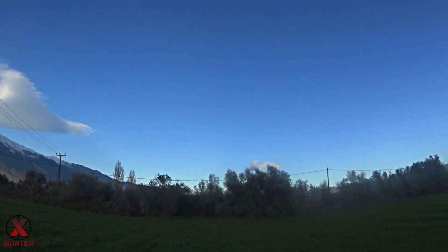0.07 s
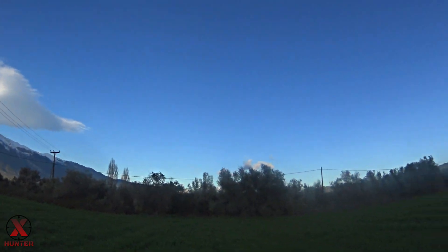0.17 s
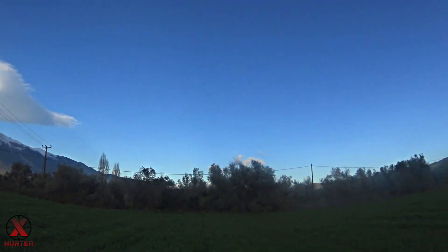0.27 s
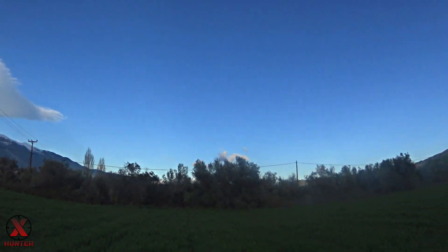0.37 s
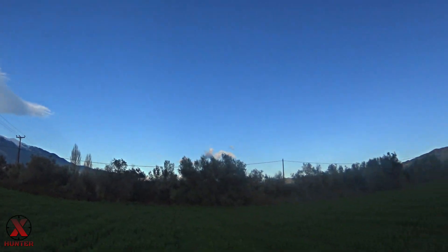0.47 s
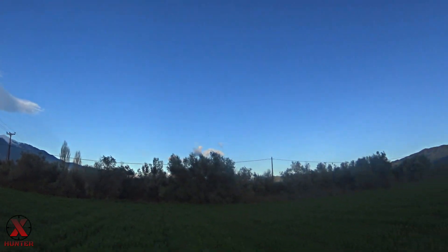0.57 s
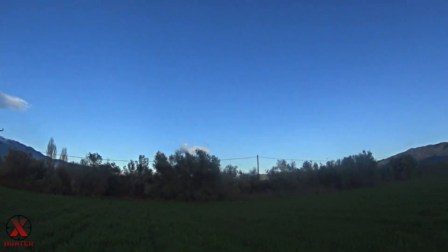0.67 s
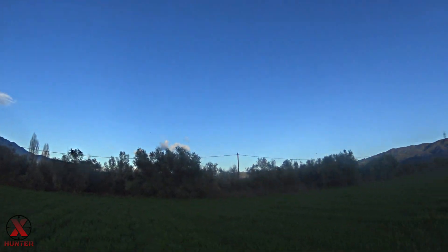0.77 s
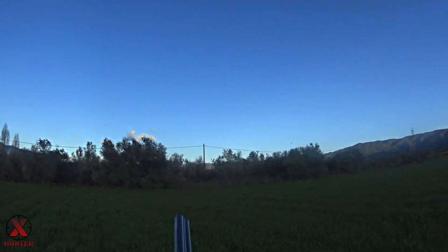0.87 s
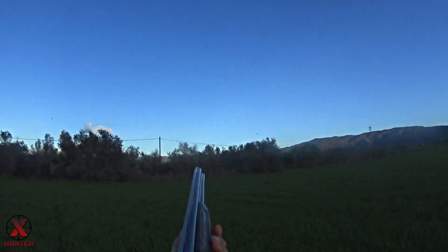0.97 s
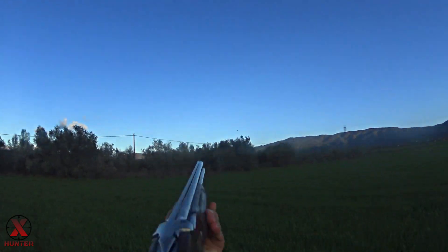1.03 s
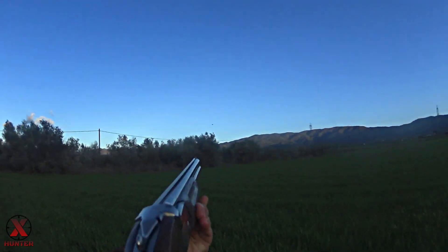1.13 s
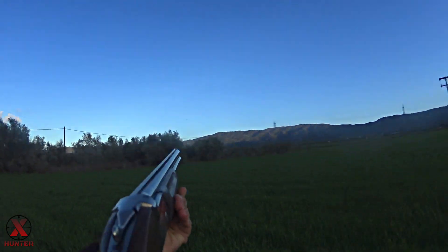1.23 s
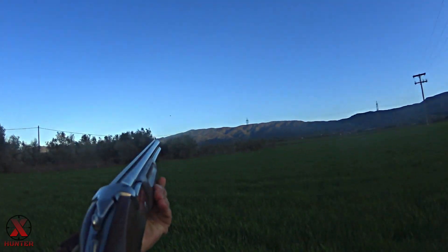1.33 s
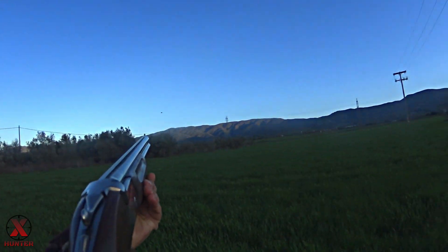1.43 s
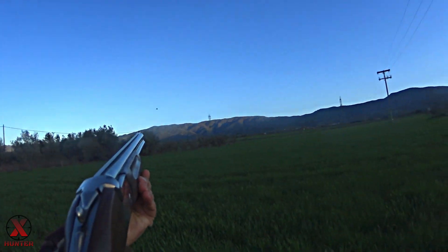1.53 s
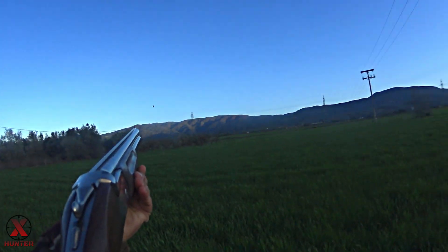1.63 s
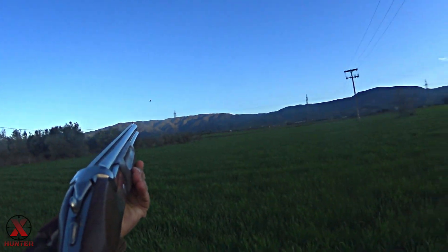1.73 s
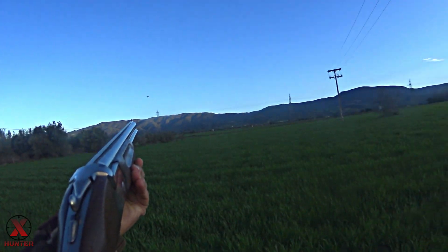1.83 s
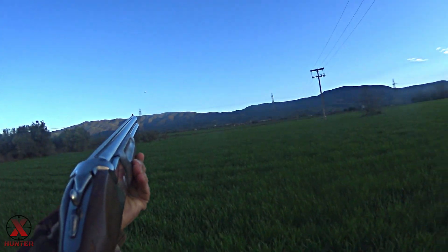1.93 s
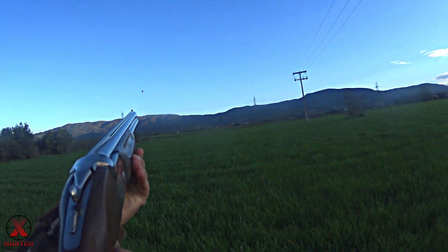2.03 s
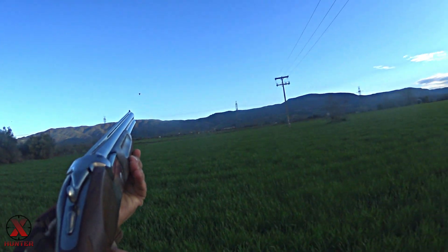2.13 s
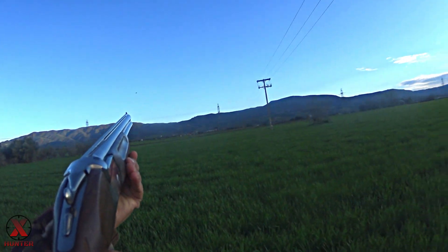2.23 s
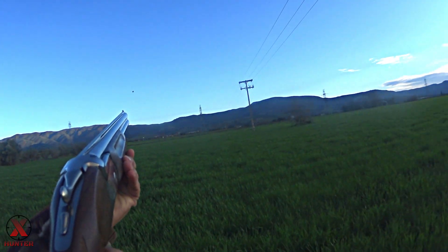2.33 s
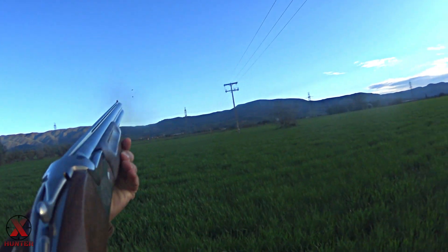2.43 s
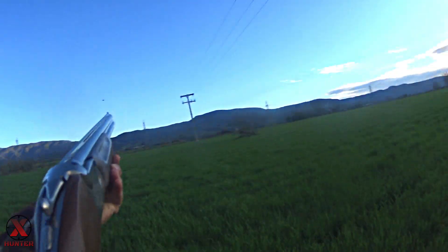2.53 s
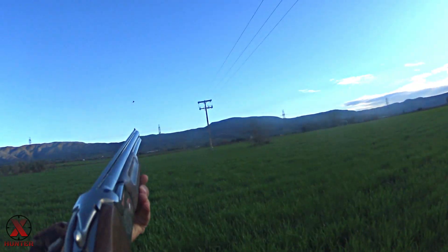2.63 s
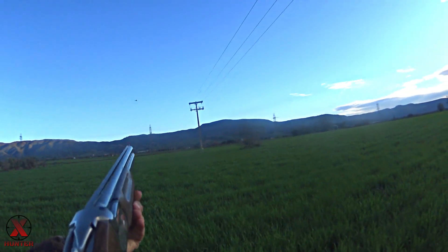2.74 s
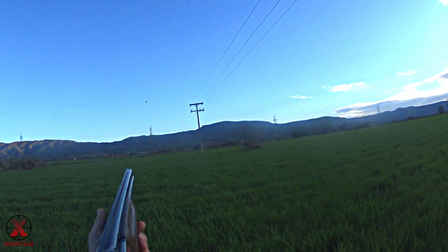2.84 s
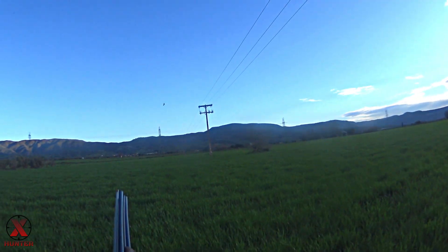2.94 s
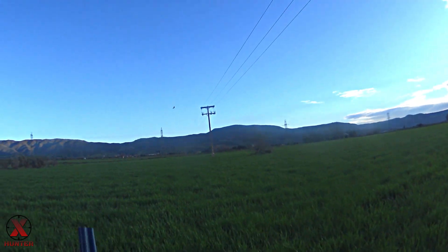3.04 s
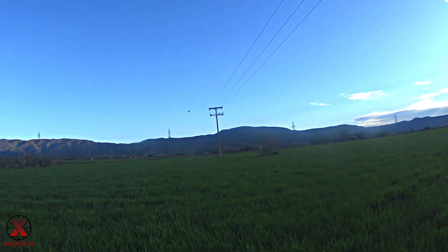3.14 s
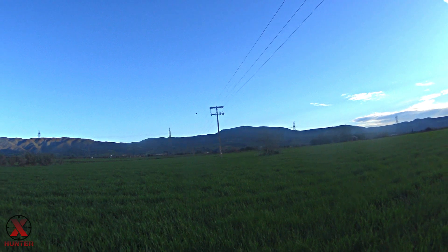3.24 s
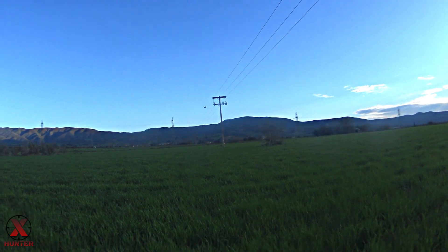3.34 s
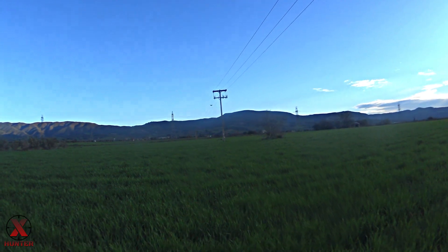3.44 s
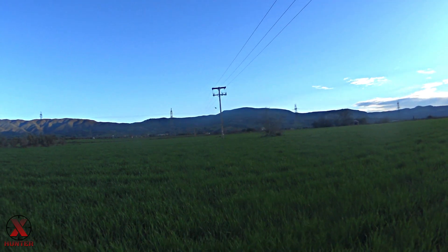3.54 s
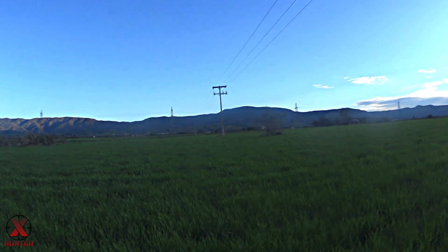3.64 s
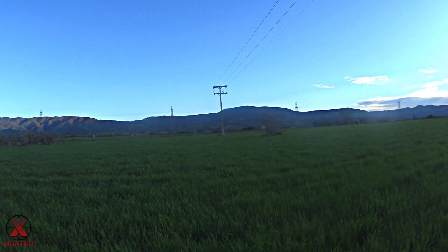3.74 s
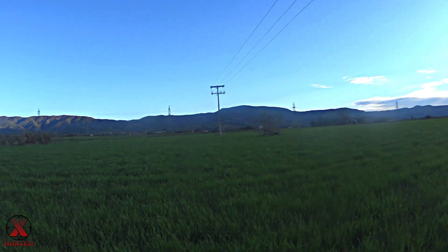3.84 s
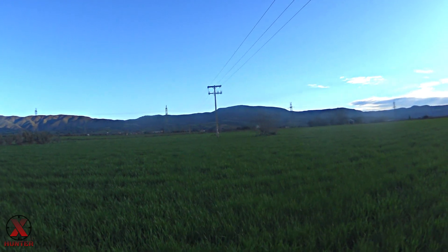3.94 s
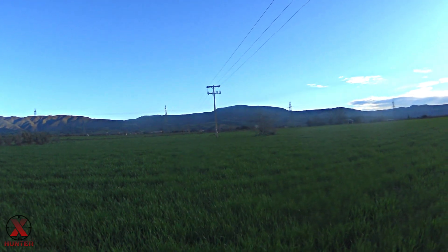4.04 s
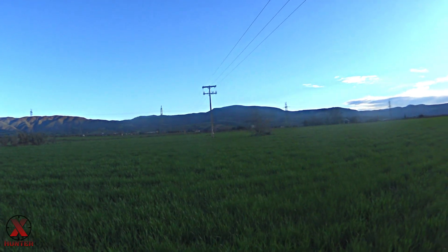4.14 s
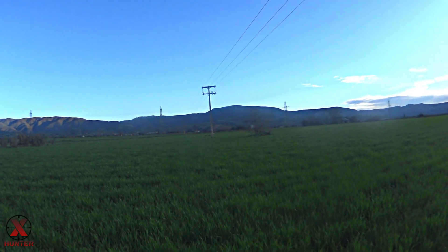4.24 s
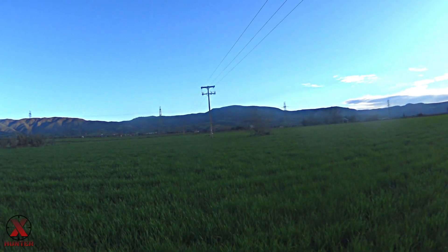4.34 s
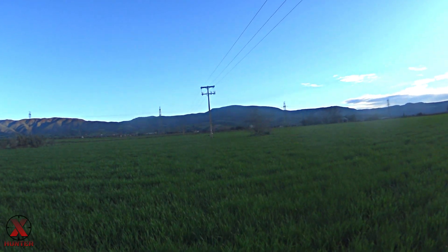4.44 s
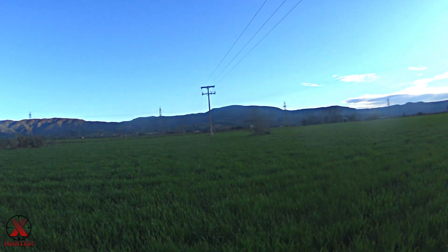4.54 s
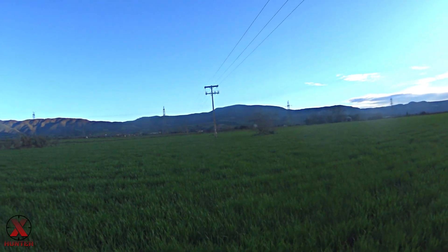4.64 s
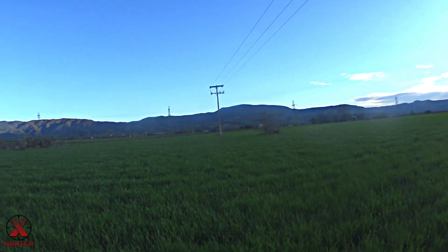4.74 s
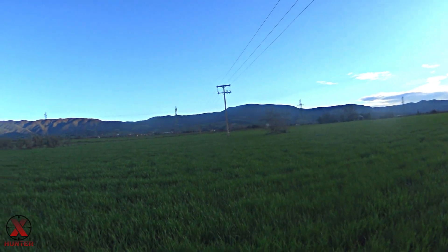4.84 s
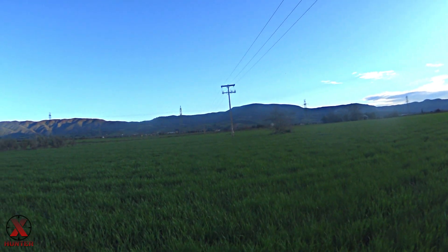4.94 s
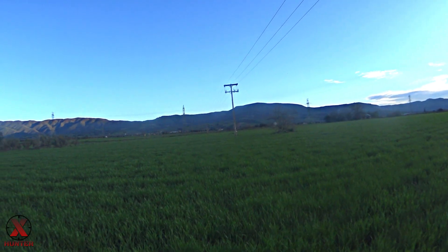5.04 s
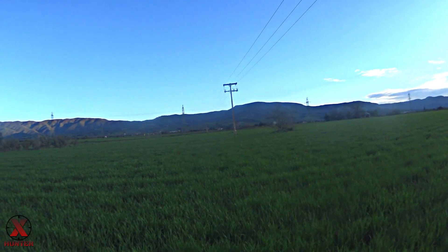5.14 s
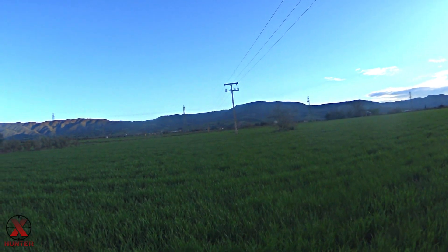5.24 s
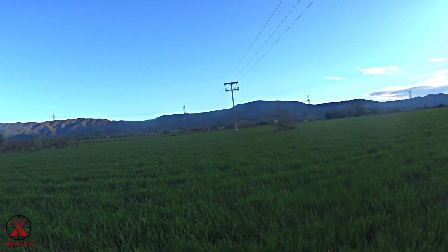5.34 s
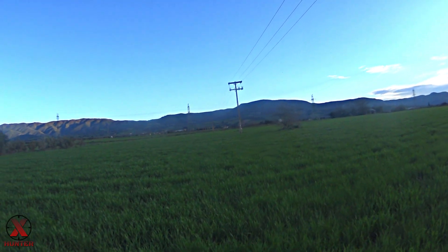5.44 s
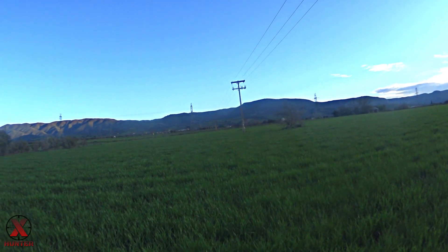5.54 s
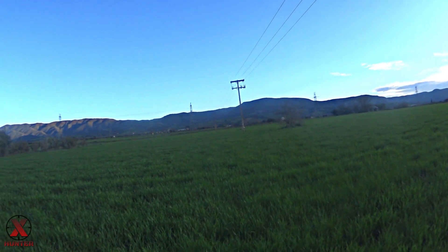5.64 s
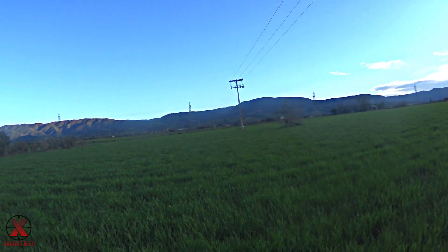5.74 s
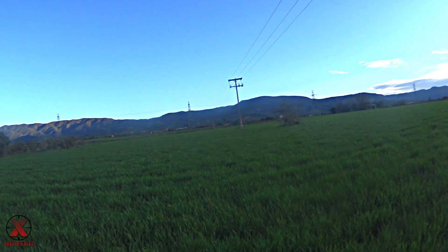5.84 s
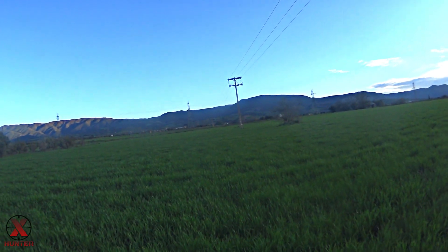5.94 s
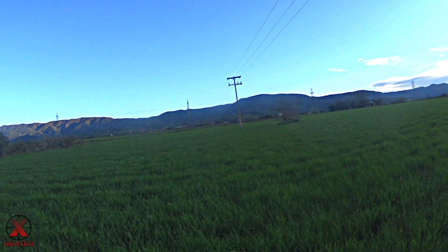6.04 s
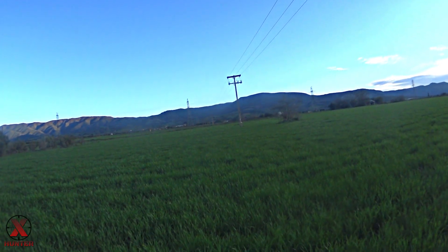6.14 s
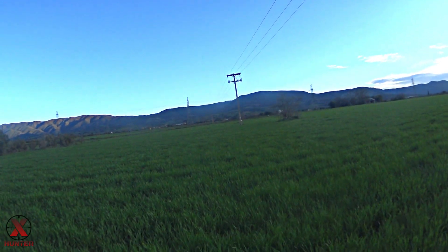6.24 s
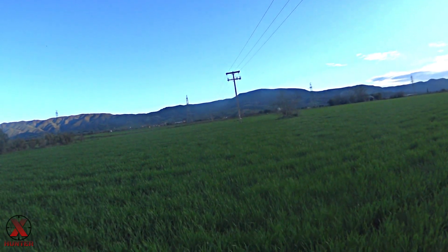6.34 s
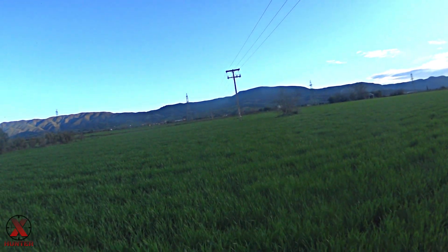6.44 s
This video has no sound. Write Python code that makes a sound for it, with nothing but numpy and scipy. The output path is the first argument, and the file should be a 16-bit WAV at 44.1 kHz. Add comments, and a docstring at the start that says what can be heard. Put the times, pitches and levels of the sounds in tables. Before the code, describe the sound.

Clothes rustle, a shotgun fires once and echoes away outdoors, then gear knocks and the gun clicks sharply over light wind.

```python
"""A shotgun in a breezy field

One shot, heard from inside a plastic case worn by the shooter. Clothes rustle as the gun comes up.
The hammer falls, the blast rolls away over the field and the recoil jolts the case. Gear knocks on
the case as the gun is lowered, a far bird whistles, and handling the gun makes a run of sharp clicks.
Gusts buffet the microphone openings, over a steady airy hiss with faint, slow, breath-like swells."""
import sys
import numpy as np
from scipy import signal
from scipy.fft import rfft, irfft
from scipy.io import wavfile

SR = 44100
rng = np.random.default_rng(int(sys.argv[2]) if len(sys.argv) > 2 else 0)


def wav_record(signal):
    """Record a signal, one row per channel, as 16-bit PCM in the file named by sys.argv[1]."""
    frames = np.transpose(np.atleast_2d(signal))
    bounded = np.clip(frames, -1, 1)
    # unit amplitude maps onto the largest positive 16-bit level
    quanta = np.round(bounded * 32767).astype(np.int16)
    wavfile.write(sys.argv[1], SR, quanta)


N = 286650
T = np.arange(N) / SR
ROLL_START_S, CUTOFF_HZ = 2.431, 11100

# Levels in a table are relative. A "colour" says how strong a noise is at each frequency.
# bursts at the front of the shot: t/s, level/dB, hold/s, decay/s, low cut/Hz
BURSTS = [(2.4086, -26, 0.0012, .002, 2190), (2.41, -36.5, 0.011, .002, 2000),
          (2.423, -14, 0.0014, 0.0038, 890), (2.428, -6.5, 0.0015, 0.0025, 260),
          (2.435, -14, .003, .003, 600), (2.479, -23.5, 0.0015, 0.002, 250),
          (2.508, -34, .0015, .0025, 500), (2.53, -27, 0.0015, 0.003, 350)]
# colour of those bursts: f/Hz, level/dB
BURST_COLOUR = [(200, -13.5), (400, 8.5), (720, 5), (950, -10), (1300, 8.5), (2000, -4.5), (3800, 0.5),
                (6000, -1.5), (8500, -4.5), (11000, -2.5)]
# colour of the shot as it rolls away: f/Hz, level/dB
ROLL_COLOUR = [(150, -25), (370, -13.5), (520, -13), (720, -10.5), (1000, -6.5), (1320, -5.5), (1650, -5.5),
               (2150, -7), (2650, -3.5), (3400, -3.5), (5900, 5), (7000, -2), (10000, -8), (11000, -7)]
# colour of the rumble under it: f/Hz, level/dB
RUMBLE_COLOUR = [(15, 6.5), (30, 1), (80, -5), (180, -1.5), (350, -3.5), (1000, -41)]
# how each part of the roll fades: level/dB, hold/s, fall/(dB/s), tail level/dB, tail fall/(dB/s)
BODY_FADE = (-24.5, 0.124, 76, -32, 24)
CRACK_FADE = (-18.4, 0.0766, 114, -32.5, 41.5)
RUMBLE_FADE = (-33, 0.1359, 228, -59, 60)
# shoves of the case: t/s, level/dB, first f/Hz, last f/Hz, glide/s, decay/s, left over right/dB
JOLTS = [(0.775, -44.5, 153, 28.2, 0.016, 0.064, -3), (1.123, -50, 170, 60, 0.018, 0.0099, -5),
         (1.154, -39, 55, 25, .015, 0.035, -2), (2.477, -28, 60, 28, 0.0084, 0.012, -2),
         (2.565, -6.5, 198, 25.2, 0.0197, 0.0087, -10), (2.5877, -17, 56.8, 24.2, 0.02, 0.015, 11),
         (5.146, -37, 536, 30, 0.0033, 0.011, -6.5)]
# blows on the case: t/s, level/dB, wall f/Hz, wall ring/dB, high cut/Hz, tick/dB, left over right/dB
KNOCKS = [(1.1717, -10, 2515, 3.5, 6000, -36, -3), (1.1743, -23.5, 1250, 37, 2400, -45, -7),
          (2.257, -41, 398, 10, 900, -40, -4), (2.5962, -17, 1600, 2, 2500, -26, -1),
          (2.624, -10, 1580, -4, 4200, -26, -10), (2.719, -22.5, 790, 2, 1610, -40, -2),
          (2.721, -28.5, 398, 14, 1610, -40, -9), (3.005, -10, 1810, 9.5, 3180, -17.5, -1.5),
          (3.189, -25.5, 1530, -10, 1400, -45, -4), (3.2098, -7.5, 1360, 7, 3300, -25.5, -7),
          (3.2456, -24, 1450, -12, 2000, -33, -4), (3.2502, -17.5, 1570, 5.5, 1900, -46, -2.5),
          (3.7527, -22, 1300, 5.5, 2850, -41, -4), (5.1461, -33, 680, 13, 900, -45, -7)]
# pitches at which the case rings: f/Hz, width/Hz, level/dB
CASE_RINGS = [(592, 200, -8.5), (763, 91, -2), (956, 130, -4), (1300, 244, -1), (1570, 270, -1.5),
              (2064, 154, -3), (2334, 175, -2), (2770, 700, -10.5), (4470, 180, -11.5), (5960, 1000, -23)]
# a brief bright scrape of cloth (first two rows), then clicks of gun and gear:
# t/s, level/dB, centre f/Hz, fade time/s (to fall by 60 dB)
SCRAPE_AND_CLICKS = [(0.9218, -28.5, 6200, 0.081), (0.929, -32, 6200, .06), (2.711, -16, 3480, 0.037),
                     (2.7182, -6.5, 2680, 0.031), (2.7454, -16, 2780, 0.048), (3.417, -29.5, 3200, 0.0088),
                     (4.8155, -33, 3300, .03), (4.83, -27, 3300, 0.026), (4.8352, -20, 2680, 0.017),
                     (4.8392, -21, 2390, 0.033), (4.856, -15, 3000, 0.031), (4.880, -15.5, 3030, 0.024),
                     (4.9196, -17.5, 2660, 0.024), (4.951, -12.5, 3300, .013), (4.954, -16, 2550, 0.015),
                     (4.9916, -19, 3840, 0.019), (5.0095, -27, 3500, .018), (5.034, -25, 3940, .04),
                     (5.044, -21.5, 3800, 0.036), (5.0518, -9.5, 5400, 0.0046), (5.0624, -7.5, 5570, 0.018),
                     (5.066, -19, 7000, 0.12), (5.115, -21.5, 4800, 0.014), (5.1384, -22, 3130, 0.037),
                     (4.931, -36, 3300, 0.018), (5.2982, -34, 2720, 0.026)]
# pitches at which these ring: f/Hz, width/Hz, level/dB
BRIGHT_RINGS = [(1316, 150, 5.5), (1950, 290, 0.5), (2680, 510, 2.5), (3300, 300, 1.5), (4150, 600, 0),
                (4790, 520, 0), (5860, 520, 2.5), (6320, 260, 2.5), (8030, 1150, -2.5), (12100, 1700, -10)]
# strokes of sleeves and jacket: peak t/s, rise/s, fall/s, level/dB
RUSTLES = [(.785, 0.035, 0.018, -51.5), (.925, .003, 0.017, -59), (.97, 0.12, 0.076, -46),
           (1.084, 0.01, 0.055, -47), (3.075, 0.0091, 0.022, -46.5), (3.15, 0.026, 0.059, -46),
           (3.275, 0.026, 0.037, -47), (4.07, 0.1, 0.1, -59), (4.2, 0.044, 0.058, -57),
           (4.85, 0.064, 0.062, -54), (5.075, 0.034, .035, -39.5), (5.22, 0.11, 0.11, -57),
           (5.83, 0.062, 0.061, -55.5)]
# colour of rubbing cloth: f/Hz, level/dB
CLOTH_COLOUR = [(300, -10), (900, -15), (1400, 1), (2000, -5.5), (2800, 1), (4500, -1.5), (6000, 0),
                (7200, -8.5), (9500, -9.5), (11000, -18)]
# the airy hiss over time, in three stretches: t/s, middle level/dB, treble level/dB
HISS_LEVELS = [
    [(0.0, -56, -54), (1.01, -54.5, -51.5), (1.22, -52.5, -55), (1.66, -57, -56), (1.91, -57, -53),
     (2.17, -60, -51), (2.36, -57.5, -53.5)],
    [(3.45, -59, -55.5), (3.83, -57, -49.5), (3.96, -57, -51.5), (4.136, -60.5, -54), (4.372, -59.5, -58),
     (4.588, -59.5, -58.5), (4.74, -57, -54.5)],
    [(5.24, -57.5, -56), (5.404, -60, -59.5), (5.58, -59.5, -57.5), (5.836, -61.5, -55.5),
     (6.018, -61.5, -59), (6.268, -56, -55), (6.5, -60.5, -61)],
]
# colour of that hiss: f/Hz, level/dB
HISS_COLOUR = [(180, -12.5), (300, -9), (450, -10), (620, -12), (950, -8), (1380, -5), (1720, -10),
               (2000, -8), (2600, -3.5), (4100, -15.5), (4700, -18), (5840, -17.5), (7000, -20),
               (11000, -25)]
# gusts on the microphone openings: peak t/s, rise/s, fall/s, buffet level/dB, sway level/dB
GUSTS = [(.25, .1, 0.17, -53.5, -65.5), (.79, 0.038, 0.23, -53.5, -47.5), (1.12, 0.089, 0.062, -48, -44.5),
         (1.16, 0.032, .05, -54, -42.5), (1.3, 0.14, 0.68, -58, -56.5), (2.33, 0.17, 0.13, -56, -57),
         (3.08, 0.26, 0.22, -46, -53), (3.25, 0.13, 0.12, -51, -51), (3.71, 0.26, 0.19, -46.5, -66),
         (4.0, 0.08, 0.2, -56, -67.5), (4.86, .06, 0.089, -65, -59), (5.14, 0.074, 0.15, -54.5, -54),
         (6.36, 0.13, 0.25, -58, -61)]
# colours of their low buffeting and very deep sway: f/Hz, level/dB
BUFFET_COLOUR = [(30, -12.5), (70, 0), (130, 1), (200, -2.5), (320, -11.5), (700, -15.5), (2000, -36)]
SWAY_COLOUR = [(12, -7.5), (28, 0.5), (50, -17), (100, -17.5), (300, -53)]
# notes of the far bird: t/s, length/s, first f/Hz, last f/Hz, level/dB
BIRD_NOTES = [(3.335, .065, 3720, 3880, -53), (3.4, .09, 3880, 3990, -56), (3.52, .09, 3990, 3580, -54),
              (3.615, .075, 3900, 3840, -56)]
# peaks and dips from the air space in the case: f/Hz, width/Hz, level/dB
CAVITY = [(1040, 260, -3.5), (1365, 190, 6), (1720, 200, -2), (2660, 280, 3.5), (5900, 700, 2)]
# how alike left and right sound: f/Hz, likeness (1 = the same)
LIKENESS = [(40, .7), (150, .75), (450, .1), (1100, .78), (1900, .45), (3800, .91), (8000, .84)]


def muzzle_blast():
    """The hammer snaps, then the blast and its first reflections arrive in ragged bursts."""
    gas, out = noise(BURST_COLOUR, cavity=0.58, apart=1.5), 0
    for s, db, hold, decay, low_hz in BURSTS:
        shape = (T >= s) * np.exp(-np.clip((T - s - hold) / decay, 0, 50))
        out = out + from_db(db) * shape * rms_one(cut(gas, low_hz, "high"))
    return out


def rolling_shot(split_hz=3000, lumpy_db=3.0, ragged_db=1.7):
    """Ground and trees scatter the shot over a short rumble; the bright crack dies before the body."""
    scatter = noise(ROLL_COLOUR)
    body = rms_one(cut(scatter, split_hz, "low", order=4)) * fading(*BODY_FADE)
    crack = rms_one(cut(scatter, split_hz, "high", order=4)) * fading(*CRACK_FADE)
    rumble = noise(RUMBLE_COLOUR) * fading(*RUMBLE_FADE)
    body *= from_db(lumpy_db * drift(41)) * panned(-2.0)
    crack *= from_db(ragged_db * drift(150))
    onset = np.clip((T - ROLL_START_S) / 0.0022, 0, 1)
    return (body + crack + rumble) * onset


def jolts():
    """Shoves such as the recoil thump the case; each sinks in pitch and centres as the mount settles."""
    out, t = np.zeros((2, N)), np.arange(SR // 4) / SR
    for s, db, first_hz, last_hz, glide, decay, pan_db in JOLTS:
        settling = np.exp(-t / glide)
        thump = tone(last_hz + (first_hz - last_hz) * settling) * np.exp(-t / decay)
        add(out, s, from_db(db) * panned(pan_db * settling) * thump)
    return out


def knocks(width_hz=150, boost_db=1.5):
    """Blows make the case ring for a few milliseconds; each spot favours one pitch."""
    out = np.zeros((2, N))
    for s, db, hz, wall_db, soft_hz, tick_db, pan_db in KNOCKS:
        hit = contact(t60=.01, grit=.03, apart=1.8)
        strengths = from_db(rng.normal(0, 1.5, (len(CASE_RINGS), 2, 1)))
        rings = sum((-1) ** k * strengths[k] * from_db(level) * resonate(hit, f, width)
                    for k, (f, width, level) in enumerate(CASE_RINGS))
        rings = cut(cut(rings, soft_hz, "low"), 300, "high")
        # the struck wall swells up to its own pitch just after the first contact
        wall = resonate(resonate(hit, hz, width_hz), hz, 4 * width_hz)
        tick = resonate(hit, hz=5530, width=1340)
        knock = rings + from_db(wall_db) * wall + from_db(tick_db) * tick
        add(out, s, from_db(db + boost_db) * panned(pan_db) * knock / np.abs(knock).max())
    return out


def scrape_and_clicks(focus_db=5.0, boost_db=3, rattle_db=-27, tick_db=-15):
    """A brief bright scrape of cloth, then clicks of gun and gear; each has a faint rattling tail."""
    out = np.zeros((2, N))
    for s, db, hz, t60 in SCRAPE_AND_CLICKS:
        hit = contact(t60, grit=0.11, apart=0.38)
        hit += from_db(rattle_db) * contact(t60=0.14, grit=0.45, apart=0.1)
        sound = from_db(tick_db) * cut(hit, 3300, "high")
        for k, (f, width, level) in enumerate(BRIGHT_RINGS):
            octaves_off = np.log2(f / hz)
            sound += (-1) ** k * from_db(level - focus_db * octaves_off ** 2) * resonate(hit, f, width)
        add(out, s, from_db(db + boost_db) * sound / np.abs(sound).max())
    return out


def cloth(grain_db=2.0, boost_db=1.5):
    """Fibres catch and slip with each movement of the arms."""
    grain = from_db(boost_db + grain_db * drift(150))
    return swells(RUSTLES, roundness=1.2) * grain * noise(CLOTH_COLOUR, apart=0.68)


def airy_hiss(split_hz=1850, top_hz=3900, middle_boost_db=2.5, treble_boost_db=2.0, top_db=-60.5):
    """A steady airy hiss with faint, slow, breath-like swells; its highest part stays even."""
    times, middle_db, treble_db = np.vstack(HISS_LEVELS).T
    hiss = noise(HISS_COLOUR, apart=1.5)
    middle = rms_one(cut(hiss, split_hz, "low", order=4))
    middle *= from_db(np.interp(T, times, middle_db) + middle_boost_db)
    treble = rms_one(cut(cut(hiss, split_hz, "high", order=4), top_hz, "low", order=4))
    treble *= from_db(np.interp(T, times, treble_db) + treble_boost_db)
    top = from_db(top_db) * rms_one(cut(noise(HISS_COLOUR, apart=5.0), top_hz, "high", order=8))
    return (middle + treble + top) * panned(-1.46)


def gusts(buffet_lull_db=-62, sway_lull_db=-65.5, flutter_db=1.17):
    """Gusts buffet the microphone openings over a deep sway; a little of both stays in the lulls."""
    buffet = swells([(s, rise, fall, db) for s, rise, fall, db, _ in GUSTS], roundness=1.67)
    buffet = np.hypot(buffet, from_db(buffet_lull_db)) * from_db(flutter_db * drift(42))
    sway = swells([(s, rise, fall, db) for s, rise, fall, _, db in GUSTS], roundness=1.7)
    sway = np.hypot(sway, from_db(sway_lull_db))
    return buffet * noise(BUFFET_COLOUR, apart=0.21) + sway * noise(SWAY_COLOUR, apart=0.13)


def bird(gain_db=-2.5, flicker_db=2.9, arch_hz=45, fade_s=0.0096):
    """A thin, wavering whistle from far off: each note is a slightly arched glide."""
    out, waver_hz = np.zeros((2, N)), 35 * drift(95)
    for s, length, first_hz, last_hz, db in BIRD_NOTES:
        t = np.arange(int(length * SR)) / SR
        glide = first_hz + (last_hz - first_hz) * t / length
        hz = glide + arch_hz * np.sin(np.pi * t / length) + np.interp(s + t, T, waver_hz)
        shape = np.clip(np.minimum(t, length - t) / fade_s, 0, 1)
        add(out, s, from_db(db) * shape * tone(hz))
    return out * from_db(gain_db + flicker_db * drift(60))


def fading(db, hold, fall_db_per_s, tail_db, tail_db_per_s):
    """Loudness of the rolling shot: it holds, falls fast, and leaves a slower tail from far off."""
    age = np.maximum(T - ROLL_START_S, 0)
    near = from_db(db - fall_db_per_s * np.maximum(age - hold, 0))
    return np.hypot(near, from_db(tail_db - tail_db_per_s * age))


def swells(rows, roundness):
    """Loudness of events that grow and die away; each row is peak t/s, rise/s, fall/s, level/dB."""
    power = np.zeros(N)
    for s, rise, fall, db in rows:
        near = slice(*np.searchsorted(T, [s - 6 * rise, s + 6 * fall]))
        away = np.maximum((s - T[near]) / rise, (T[near] - s) / fall)
        power[near] += from_db(db) ** 2 * np.exp(-2 * away ** roundness)
    return np.sqrt(power)


def contact(t60, grit, apart):
    """One tap and a spray of tiny ones that fades by 60 dB in t60 seconds, partly unlike on each side."""
    t = np.arange(SR // 10) / SR
    spray = rng.standard_normal((3, len(t))) * from_db(-60 * t / t60)
    return (t == 0) + grit * (spray[0] + apart * spray[1:])


def noise(colour, cavity=1.0, apart=1.0):
    """Coloured noise as it sounds inside the case; a larger `apart` makes left and right less alike."""
    hz = np.fft.rfftfreq(N, 1 / SR)
    cavity_db = sum(db / (1 + (2 * (hz - f) / width) ** 2) for f, width, db in CAVITY)
    gain = from_db(at_hz(colour, hz) + cavity * cavity_db) * (hz < CUTOFF_HZ)
    alike = np.clip(1 - apart * (1 - at_hz(LIKENESS, hz)), -1, 1)
    mid, side = rfft(rng.standard_normal((2, N))) * gain
    return rms_one(irfft(np.sqrt(1 + alike) * mid + np.sqrt(1 - alike) * side * [[1], [-1]], N))


def drift(rate_hz):
    """A random wobble of typical size 1, mostly slower than the given rate."""
    hz = np.fft.rfftfreq(N, 1 / SR)[:N // 16]
    spectrum = rng.standard_normal(2 * len(hz)).view(complex)
    return rms_one(irfft(spectrum / (1 + (hz / rate_hz) ** 2), N))


def tone(hz):
    """A pure tone that follows a changing pitch."""
    return np.sin(2 * np.pi * np.cumsum(hz) / SR)


def resonate(x, hz, width):
    """Make a sound ring at one pitch; a narrower width rings longer."""
    r = np.exp(-np.pi * width / SR)
    feedback = [1, -2 * r * np.cos(2 * np.pi * hz / SR), r * r]
    return signal.lfilter(np.array([1, 0, -1]) * (1 - r * r) / 2, feedback, x)


def cut(x, hz, keep, order=2):
    """Keep the "low" or the "high" side of a frequency."""
    return signal.sosfilt(signal.butter(order, hz, keep, fs=SR, output="sos"), x)


def at_hz(points, hz):
    """Read between the rows of a frequency table, with octaves evenly spaced."""
    f, value = np.transpose(points)
    return np.interp(np.log(hz + 1e-3), np.log(f), value)


def from_db(db):
    """Turn decibels into a gain."""
    return 10 ** (np.asarray(db) / 20)


def rms_one(x):
    """Scale a sound to an average power of 1."""
    return x / np.sqrt(np.mean(x ** 2) + 1e-20)


def panned(pan_db):
    """Left and right gains; above 0 dB the left is louder."""
    return from_db(np.array([[.5], [-.5]]) * pan_db)


def add(out, s, sound):
    """Mix a short sound in at its time."""
    i = int(s * SR)
    out[:, i:i + sound.shape[-1]] += sound[..., :N - i]


def scene():
    """The shot, the handling and the field, added together."""
    shot = muzzle_blast() + rolling_shot()
    return shot + jolts() + knocks() + scrape_and_clicks() + airy_hiss() + gusts() + cloth() + bird()


def record(dry, ceiling=.9):
    """Round off the loudest peaks and cut the highest treble."""
    rounded = ceiling * np.tanh(dry / ceiling)
    return signal.sosfilt(signal.ellip(12, .2, 80, CUTOFF_HZ, fs=SR, output="sos"), rounded)


dry = scene()
out = record(dry)
wav_record(out)
```